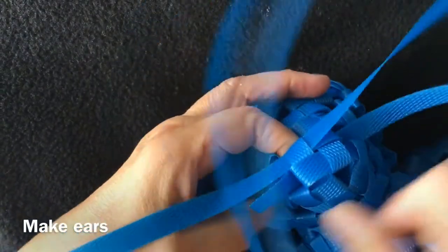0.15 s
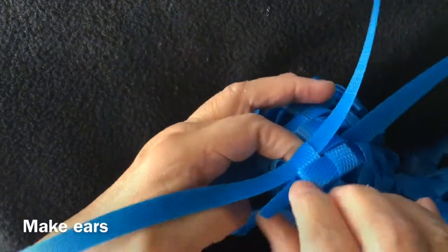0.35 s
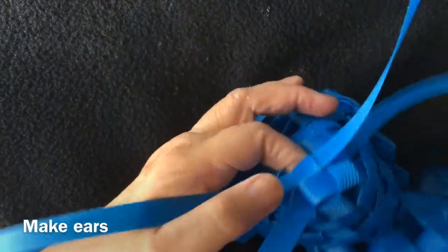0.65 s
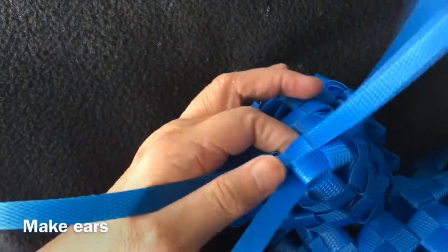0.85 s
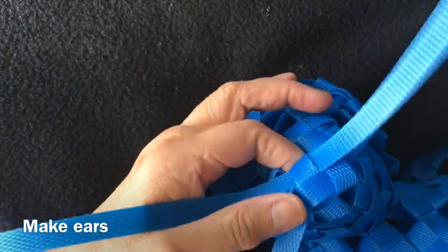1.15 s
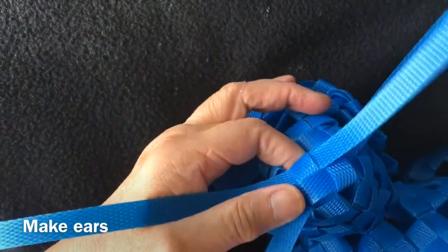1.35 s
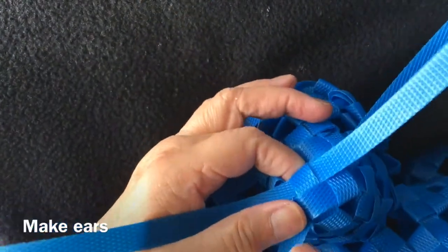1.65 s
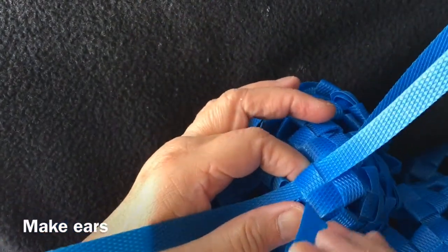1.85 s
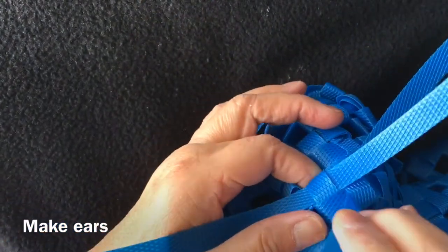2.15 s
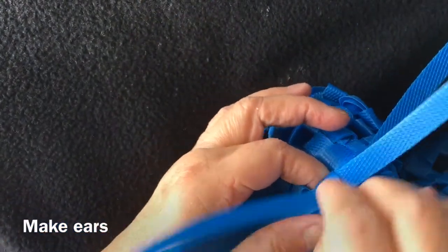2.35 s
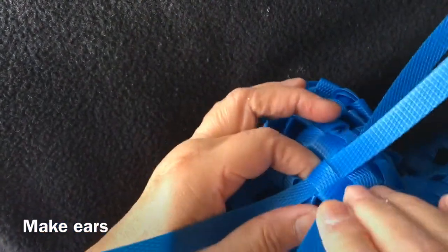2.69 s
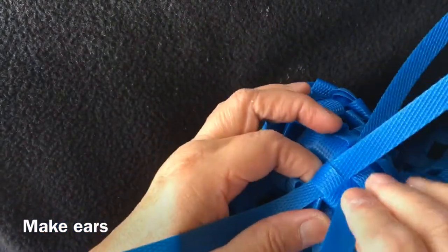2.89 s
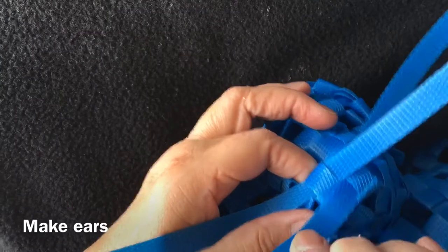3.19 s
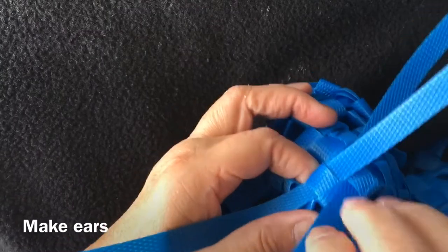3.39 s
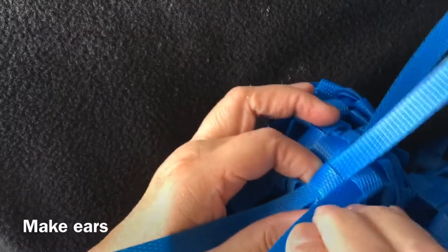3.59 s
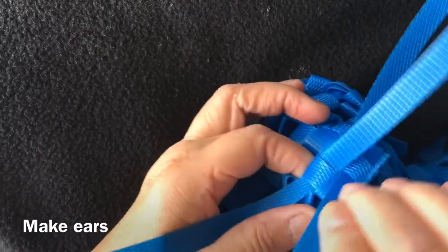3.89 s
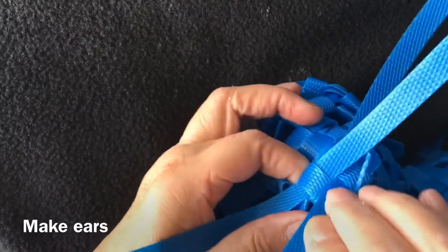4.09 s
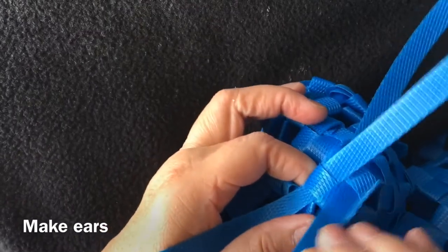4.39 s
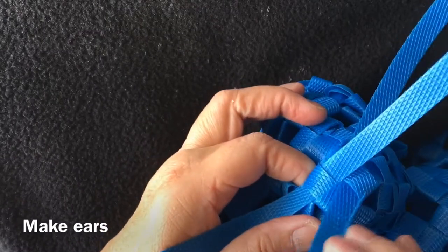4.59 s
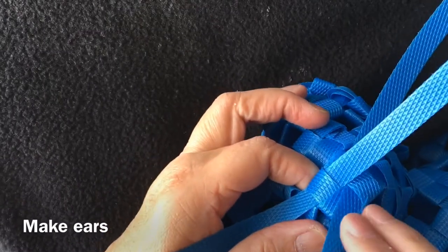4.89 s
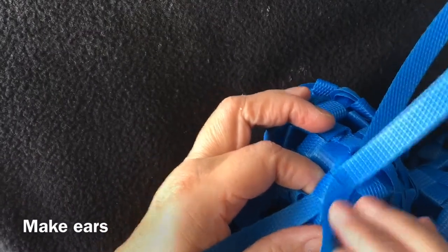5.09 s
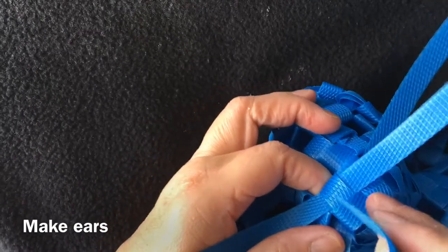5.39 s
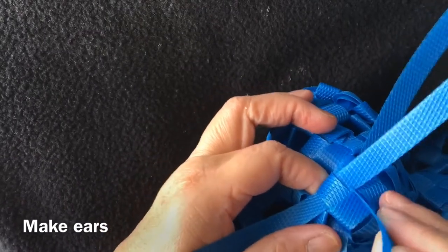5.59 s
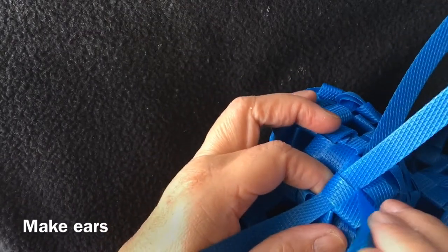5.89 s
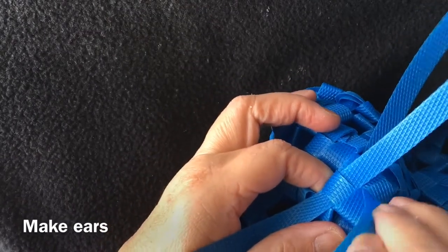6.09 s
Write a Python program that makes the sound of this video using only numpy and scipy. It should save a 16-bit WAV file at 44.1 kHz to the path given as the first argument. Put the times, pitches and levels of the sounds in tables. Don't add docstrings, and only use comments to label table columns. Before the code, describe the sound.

Fingers rustle stiff plastic straps up close, then one ribbed strap zips through with a buzzing rasp and loud snaps, followed by sparse ticks and flips.

```python
import sys
import numpy as np
from scipy import signal
from scipy.io import wavfile
from scipy.ndimage import uniform_filter1d

SR = 44100
rng = np.random.default_rng(int(sys.argv[2]) if len(sys.argv) > 2 else 0)


def file_out(sig):
    cols = np.atleast_2d(sig).T
    lim = np.clip(cols, -1, 1)
    pcm = np.round(lim * 32767).astype(np.int16)
    wavfile.write(sys.argv[1], SR, pcm)


def ratio(d):
    e = np.asarray(d, float) / 20
    return 10 ** e


N = 275625

# pitch_hz, width_hz, level_db
WEAVE_TONES = [(835, 200, 4), (1250, 120, 8.5), (1630, 930, -11), (2220, 720, 0.5), (2720, 220, -12.5)]


def evened(x):
    return x / np.sqrt(np.mean(x ** 2) + 1e-20)


def add(mix, s, sound):
    part = mix[round(s * SR):][:len(sound)]
    part += sound[:len(part)]


def along(rows):
    s, *columns = np.transpose(rows)
    return [np.interp(np.arange(N) / SR, s, column) for column in columns]


def slow_noise(samples):
    return evened(uniform_filter1d(rng.standard_normal(N), samples))


def colour(x, points):
    f, db = np.transpose(points)
    hz = abs(np.fft.fftfreq(8192, 1 / SR))
    log_gain = np.log(ratio(np.interp(np.log(hz + 1), np.log(f), db, -70, -70)))
    taps = np.fft.ifft(np.exp(np.conj(signal.hilbert(log_gain)))).real[:4096]
    return evened(signal.oaconvolve(x, taps)[:len(x)])


def resonate(x, hz, width):
    return signal.lfilter(*signal.iirpeak(hz, hz / width, SR), x)


def grit(per_s, spread_db, smooth):
    size = ratio(spread_db * np.minimum(rng.exponential(1, N), 4)) * (rng.random(N) < per_s / SR)
    flicker = signal.lfilter([1], [1, -.96], size)
    return rng.standard_normal(N) * (smooth + evened(flicker))


def patchy(x, depth_db):
    z = signal.stft(x, nperseg=256)[2]
    field = uniform_filter1d(rng.standard_normal(z.shape), size=6, axis=0)
    field = uniform_filter1d(field, size=6, axis=1)
    return evened(signal.istft(z * ratio(depth_db * evened(field)), nperseg=256)[1][:N])


def air():
    # pitch_hz, level_db (per Hz)
    air_colour = [(15, -56), (25, -8.5), (65, 2.5), (146, 1), (220, -2.5), (496, -13.5), (878, -18),
                  (2040, -23), (3510, -27), (11000, -30.5), (14000, -34.5), (16500, -54.5)]
    noise = colour(patchy(rng.standard_normal(N), 0.51), air_colour)
    return ratio(-68.5 + 2.5) * noise * ratio(0.45 * slow_noise(6000))


def room_tail():
    t = np.arange(SR // 2) / SR
    hiss = signal.lfilter([1], [1, -.6], rng.standard_normal(len(t)))
    tail = hiss * ratio(-60 * t / 0.13) * (t > .006)
    return tail / np.linalg.norm(tail)


def snap(row, noise):
    s, body_db, body_hz, edge_db, edge_hz, crack_db = row
    t = np.arange(len(noise)) / SR
    ragged = ratio(3.0 * evened(uniform_filter1d(noise[::-1], 60)))
    fade = ratio(-60 * t / .005) + ragged * ratio(-24 - 60 * t / .03)
    burst = noise * fade * np.minimum(t / .0005, 1)
    burst[20] += 4.2
    lag = round(2 * SR / edge_hz)
    burst = burst + 0.047 * np.roll(burst, lag)
    echoes = 0
    for k in range(1, 4):
        delay = 6 + round(22 * abs(noise[-k]))
        echoes = echoes + .35 * np.sign(noise[k]) * np.roll(burst, delay)
    burst = burst + echoes
    body = resonate(burst, body_hz, 0.22 * body_hz)
    body = body + 0.23 * resonate(burst, 2200.0, 3000.0) + 0.11 * resonate(burst, 460.0, 380.0)
    edge = resonate(burst, edge_hz, 800.0) + 0.4 * resonate(burst, 7200.0, 4200.0)
    crack = resonate(resonate(burst, 11500., 7400.0), 11500., 7400.0)
    parts = [(body_db, body), (edge_db, edge), (crack_db, crack)]
    return sum(ratio(db) * x / abs(x).max() for db, x in parts)


def crinkle():
    ticks_per_s = 70.
    size = ratio(4 * np.minimum(rng.exponential(1, N), 3)) * (rng.random(N) < ticks_per_s / SR)
    spot, out = rng.integers(0, 6, N), np.zeros(N)
    for k, (u, v, noise) in enumerate(zip(*rng.random((2, 6)), rng.standard_normal((6, 1000)))):
        tick = snap((0, -3, 1000 * 3 ** u, 0, 3500 * 2.2 ** v, -6), noise)
        out += signal.oaconvolve(size * (spot == k), tick)[:N]
    return evened(out)


def slide():
    # pitch_hz, level_db (per Hz)
    rustle_colour = [(1470, -24.5), (2500, -2.5), (3510, -6), (4240, -9), (7090, -10.5), (11700, -12),
                     (15200, -14.5), (16100, -35), (16500, -25.5)]
    # start_s, end_s, rustle_db, body_db
    rubs = [(0, 0.218, -62, -62.5), (0.11, 0.417, -65, -68.5), (0.342, 0.635, -72, -75),
            (0.539, 0.63, -78, -58), (0.623, 0.733, -51, -51.5), (1, 1.024, -58, -41),
            (1.01, 1.102, -61.5, -63), (1.298, 1.449, -68.5, -73.5), (1.636, 1.682, -60, -53.5),
            (1.72, 1.765, -70, -85), (0.38, 0.414, -73, -77), (1.65, 1.878, -70, -76),
            (2.46, 2.674, -79, -83), (2.805, 2.902, -72, -75), (2.927, 2.978, -64, -69),
            (3.077, 3.109, -66, -72), (3.21, 3.438, -82, -75.5), (3.378, 3.465, -73.5, -71),
            (3.652, 3.754, -70.5, -67.5), (3.774, 3.917, -69.5, -78), (3.899, 3.952, -67, -61.5),
            (4.404, 4.558, -63, -62.5), (4.48, 4.496, -51.5, -62), (4.613, 4.657, -73, -78),
            (4.693, 4.832, -77, -80.5), (4.418, 4.441, -69, -70), (2.528, 2.6, -74, -82),
            (1.568, 1.64, -73, -76), (5.125, 5.18, -61, -62), (5.145, 5.289, -53, -56),
            (5.272, 5.364, -53.5, -61.5), (6.041, 6.06, -65, -76), (6.055, 6.171, -74, -77)]
    # start_s, end_s, rustle_db, body_db
    scuffs = [(1.211, 1.251, -66, -54.5), (1.324, 1.338, -92, -58), (2.015, 2.068, -74, -70.5),
              (2.064, 2.093, -72, -62), (2.093, 2.116, -68, -61.5), (2.312, 2.336, -67.5, -67.5),
              (2.334, 2.403, -64.5, -65), (2.388, 2.503, -74.5, -76), (2.85, 2.858, -71, -67),
              (2.902, 2.918, -67.5, -72), (2.964, 2.966, -73.5, -71), (3.056, 3.084, -63, -67.5),
              (3.423, 3.466, -59, -56), (3.761, 3.812, -71, -63), (3.841, 3.843, -71, -64),
              (3.857, 3.873, -62, -57), (3.899, 3.917, -51, -49.5), (3.911, 3.924, -57, -56),
              (3.94, 4.04, -82, -76), (5.04, 5.067, -66, -71), (5.082, 5.103, -73, -53.5),
              (0.13, 0.148, -62, -78), (0.182, 0.202, -80, -61)]
    # start_s, t60_s (time to fade by 60 dB), rustle_db, body_db
    settles = [
        (1.132, 0.14, -55.5, -55),
        (1.548, 0.068, -57, -52.5),
        (1.599, 0.045, -63, -46),
        (1.662, 0.051, -48, -64),
        (2.613, 0.049, -66, -65),
        (5.618, 0.033, -53.5, -54),
        (6.039, 0.028, -56, -61),
        (6.059, 0.031, -43, -59),
    ]
    slips = patchy(grit(450., 3.5, 1.), 3.4)
    rustle = colour(slips, rustle_colour) + ratio(-13) * crinkle()
    body = evened(sum(ratio(db) * resonate(slips, hz, 3 * width) for hz, width, db in WEAVE_TONES))
    bright, dull = np.zeros((2, N))
    for start, end, rustle_db, body_db in rubs + scuffs:
        stroke = signal.windows.tukey(round((end - start) * SR), .8)
        add(bright, start, ratio(rustle_db) * stroke)
        add(dull, start, ratio(body_db) * stroke)
    for start, t60, rustle_db, body_db in settles:
        fade_db = -60 * np.arange(6000) / SR / t60
        add(bright, start, ratio(rustle_db + fade_db))
        add(dull, start, ratio(body_db + fade_db))
    return bright * rustle + dull * body


def snaps():
    # start_s, edge_db, edge_hz
    ticks = [(.071, -49, 8000), (.081, -58, 7000), (.187, -56, 2780), (.242, -44.5, 8300),
             (.345, -50, 8800), (.377, -46, 7000), (.386, -53.5, 6960), (.613, -54, 3000),
             (.623, -50, 6000), (.64, -56, 8070), (.6775, -20.5, 9400), (.81, -26, 9500), (.89, -31, 7700),
             (.97, -38, 4600), (1.017, -50, 4500), (1.2255, -49, 6500), (1.2355, -53, 7000),
             (1.377, -57, 4700), (1.404, -58, 5930), (1.551, -50, 10900), (2.044, -56, 8000),
             (2.073, -55, 6000), (2.082, -64, 5000), (2.1, -60, 4270), (2.11, -60, 9000),
             (2.506, -56, 3720), (2.531, -55, 4200), (2.872, -59, 2200), (2.885, -61, 9900),
             (2.929, -63, 13000), (2.956, -54, 11000), (2.961, -54, 3000), (3.073, -47, 10000),
             (3.103, -57, 4580), (3.1465, -43.5, 4770), (3.266, -54.5, 12000), (3.411, -59, 3000),
             (3.433, -49, 4200), (3.437, -53, 5340), (3.443, -48, 2930), (3.8, -54, 12400),
             (3.815, -58, 4500), (3.917, -46, 4500), (3.927, -47, 9000), (3.985, -61, 12500),
             (4.095, -54.5, 4030), (4.204, -58.5, 10950), (4.675, -54, 5100), (4.943, -62.5, 8890),
             (4.992, -51, 6700), (5.144, -42, 5600), (5.216, -38, 6500), (5.2218, -35.5, 2600),
             (5.242, -40, 7000), (5.2542, -42, 7130), (5.329, -35, 12000), (5.347, -42, 3300),
             (5.6194, -45, 4350), (5.623, -41, 4260), (5.7195, -51.5, 5540)]
    # start_s, body_db, body_hz
    knocks = [(.078, -51, 735), (0.431, -45, 950), (0.527, -42.5, 2870), (.572, -53, 1080),
              (0.5862, -47, 2480), (0.594, -43, 2360), (0.649, -34.5, 2860), (.673, -24, 1250),
              (1.015, -24, 1120), (1.0864, -33.5, 1335), (1.2251, -46.5, 1830), (2.0731, -47.5, 1180),
              (2.1, -37.5, 1165), (2.372, -40.5, 1113), (2.9152, -47.5, 1960), (3.102, -47.5, 2220),
              (5.62, -42, 1250), (3.211, -53.5, 1780), (3.261, -53.5, 1200), (3.44, -40.5, 2730),
              (3.532, -50, 1085), (3.788, -40.5, 1100), (3.842, -42.5, 1000), (3.866, -47, 1080),
              (4.013, -42, 3500), (4.462, -41, 1871), (4.992, -46.5, 1210), (6.0396, -44, 1250)]
    # start_s, edge_db, edge_hz, body_db, body_hz
    cracks = [(0.1043, -44, 7100, -49, 1850), (0.138, -49, 5200, -54, 2680), (0.3242, -45, 5200, -47, 1830),
              (0.675, -30, 5950, -26.5, 2820), (0.6859, -31, 7640, -12.5, 1900),
              (0.6886, -13, 7766, -14.5, 2900), (0.832, -32, 6600, -25, 1500), (.817, -35, 9400, -30, 1700),
              (0.8294, -28, 11000, -20, 1310), (0.837, -14.5, 6600, -20, 1510),
              (0.8448, -17, 6660, -13.5, 1450), (0.949, -21, 6760, -20, 1800),
              (1.133, -19.5, 7150, -23, 2390), (1.547, -40, 7150, -39, 1230),
              (1.6611, -23.5, 9250, -30.5, 2340), (2.6142, -28, 13600, -35, 3990),
              (2.6272, -46.5, 8600, -49, 3320), (2.9439, -44.5, 4440, -47.5, 1080),
              (3.07, -49, 4050, -71.5, 2470), (3.0694, -51, 6780, -59, 2720),
              (3.8616, -47.5, 6350, -35.5, 994), (3.9051, -32, 6200, -31.5, 1880),
              (4.4846, -27.5, 4740, -35.5, 1887), (5.0874, -22, 4410, -42.5, 1400),
              (5.2516, -40.5, 3850, -36, 2230), (5.304, -33, 6240, -39, 2460),
              (5.327, -25.5, 7400, -35.5, 2110), (0.29, -58, 4000, -45.5, 1800)]
    # start_s, edge_db, edge_hz, body_db, body_hz
    clacks = [(0.3089, -45, 6740, -53, 1940), (0.4248, -44, 6800, -58, 1000),
              (0.6896, -16, 6650, -12, 1168), (0.9855, -21, 6440, -40, 1960),
              (0.9949, -24.5, 4400, -28, 1970), (1.0111, -36, 6736, -36.5, 2670),
              (1.1972, -39, 6460, -40.5, 2460), (1.2311, -53, 7160, -38.5, 1180),
              (1.601, -20, 5920, -27, 2080), (1.672, -29, 4500, -54.5, 3540),
              (2.007, -48, 5820, -42.5, 1190), (2.369, -46, 7030, -38, 1970),
              (2.489, -43.5, 7000, -47, 1480), (3.161, -44.5, 5600, -45.5, 2000),
              (3.451, -41, 6820, -40.5, 2040), (3.9106, -53, 6604, -33.5, 1390),
              (4.6929, -41, 5840, -33, 1130), (5.0533, -45.5, 7030, -50.5, 1947),
              (5.1754, -19.5, 11880, -24.5, 5070), (5.1783, -6, 7460, -19.5, 1340),
              (5.194, -34, 3460, -35, 2000), (5.162, -50, 7200, -37, 1305),
              (5.1975, -35.5, 3530, -32.5, 2000), (5.2075, -33, 3500, -33, 1340),
              (5.2963, -39, 3640, -49.5, 2360), (6.05, -33, 7080, -50, 1500), (6.057, -21, 7150, -33, 1550)]
    rows = [(s, b, bhz, e, ehz, e - 3) for s, e, ehz, b, bhz in cracks]
    rows += [(s, b, bhz, e, ehz, e - 22.5 + 0.15 * (e + 30)) for s, e, ehz, b, bhz in clacks]
    rows += [(s, b, bhz, b - 18, 6900, b - 23) for s, b, bhz in knocks]
    rows += [(s, e - 13.5, 1800, e, ehz, e - 11) for s, e, ehz in ticks]
    out = np.zeros(N)
    for row, noise in zip(rows, rng.standard_normal((len(rows), 1500))):
        add(out, row[0], snap(row, noise))
    bounce = np.zeros(N)
    add(bounce, .0026, ratio(-14.5) * out)
    return out + bounce


def pull():
    # start_s, ribs_per_s, force_db, hum_db (from tension),
    # slack_db (favours the lowest tone), weave_db (ring of the weave)
    course = [
        (0.666, 176, -41.5, -59.5, -0.5, -2),
        (.71, 204, -37.5, -51, -3, -5.5),
        (0.739, 248, -35, -43, 1.5, -6.5),
        (0.784, 272, -38.5, -44, -5, 1),
        (0.807, 248, -36.5, -57.5, -3, 7),
        (0.842, 254, -34.5, -49, -5.5, -2),
        (0.861, 300, -35, -45.5, -6, -3),
        (0.934, 311, -36.5, -46.5, 0, 1),
        (1.005, 178, -39, -41, -18.5, 1.5),
    ]
    # pitch_hz, level_db (per Hz)
    rasp_colour = [(410, -18.5), (700, -11), (912, -24), (1100, -4.5), (1650, -7), (2840, -11), (3120, -16),
                   (9600, -17.5), (14800, -22), (15900, -26), (16500, -57.5)]
    # pitch_hz, level_db
    strap_tones = [(170, -7), (250, 2.5), (310, -3), (400, 2.5), (520, -3.5), (610, 3.5), (760, 0),
                   (980, -21), (1110, -3.5), (1250, -3), (1450, -7.5), (1620, -5), (1850, -5.5),
                   (2170, -1.5), (2600, -11)]
    per_s, force_db, hum_db, slack_db, weave_db = along(course)
    turns = np.cumsum(per_s * (1 + 0.013 * slow_noise(300))) / SR
    ribs = np.diff(np.floor(turns), prepend=0) * ratio(2.5 * rng.standard_normal(N))
    buzz = np.zeros(N)
    for k, (hz, width, db) in enumerate(WEAVE_TONES):
        buzz += (-1) ** k * ratio(db) * resonate(resonate(ribs, hz, width), hz, 2 * width)
    slips = grit(800., 3., 2.)
    gate = 1.1 + np.exp(-(turns % 1) / 0.57)
    rasp = colour(patchy(slips * gate, 2.5), rasp_colour)
    edge_tones = [(4300, -3), (6500, 1), (9500, -3.0)]
    rasp = rasp + sum(ratio(db) * resonate(rasp, hz, 700.0) for hz, db in edge_tones)
    hum = np.zeros(N)
    for k in range(1, 10):
        level_db = hum_db if k < 4 else force_db + weave_db - 7
        level_db = level_db + slack_db * (k == 1) - slack_db * (k == 2)
        level_db = level_db + np.interp(k * per_s, *np.transpose(strap_tones))
        hum += ratio(level_db) * ratio(4 * slow_noise(900)) * np.sin(2 * np.pi * k * turns)
    hum *= ratio(9 * np.minimum(np.gradient(per_s) * SR / 1000, 0))
    on, start, end = np.zeros(N), course[0][0], course[-1][0]
    add(on, start, signal.windows.tukey(round((end - start) * SR), .05))
    knocks = ratio(-11.5 + weave_db) * patchy(buzz, 3.2)
    return on * (ratio(force_db) * (rasp + ratio(-27.5) * crinkle() + knocks) + hum)


def bumps():
    # peak_s, level_db, build_up_s, release_s
    leans = [
        (.75, -48.5, 0.32, 0.07),
        (.96, -41.5, 0.2, 0.14),
        (1.698, -54.5, 0.34, 0.03),
        (2.389, -48, 0.094, 0.024),
        (2.868, -64.5, 0.11, 0.07),
        (3.93, -53.5, 0.42, 0.11),
        (4.488, -50, 0.11, 0.072),
        (5.189, -44, 0.068, 0.1),
    ]
    # start_s, level_db, pitch_hz
    pushes = [(0.97, -36, 94), (0.985, -25, 385), (1.008, -29, 401), (2.859, -38.5, 107),
              (2.959, -49.5, 129), (3.147, -39.5, 447), (3.441, -71.5, 141), (3.865, -43, 170),
              (3.902, -40, 169), (4.525, -48.5, 59.6), (5.179, -32, 277), (5.183, -57, 120),
              (1.2, -52.5, 350), (1.662, -38, 410), (4.692, -43, 486), (5.181, -27, 514)]
    # pitch_hz, level_db (per Hz)
    rumble_colour = [(15, -29), (25, -10), (49, -8.5), (107, -4.5), (177, 0), (233, -10.5), (322, -3.5),
                     (500, -20.5), (650, -30.5), (1100, -120)]
    t = np.arange(N) / SR
    weight = ratio(-73)
    for s, db, rise, fall in leans:
        weight = weight + ratio(db - 25 * np.where(t < s, (s - t) / rise, (t - s) / fall))
    out = weight * ratio(-6.5) * colour(grit(40., 0.96, 10.0), rumble_colour)
    t = t[:6000]
    for s, db, hz in pushes:
        fade = ratio(db - 60 * t * hz / 6.75)
        add(out, s, fade * np.sin(2 * np.pi * hz * t) * np.minimum(t * hz, 1))
    return out


def scene():
    far = air() + bumps()
    near = slide() + snaps() + pull()
    return (near + ratio(-21.0) * signal.fftconvolve(near, room_tail())[:N] + far)[None]


def smear(x):
    # start_s, spread_db, centre_hz, half_width_hz
    smeared_snaps = [(.689, 5, 6500, 3000), (.838, -1, 6500, 1497), (1.133, -19, 7000, 2500),
                     (1.601, -7, 5540, 2535), (1.664, 6, 4200, 3535), (3.147, 4, 5000, 2990),
                     (5.62, 3, 4400, 1197), (3.908, -1, 5000, 4000), (4.485, 1, 4980, 2550),
                     (4.693, 11.5, 5800, 2515), (4.992, 6.5, 6680, 890), (5.088, 4, 5500, 2500),
                     (5.176, 6.5, 7150, 700), (5.327, -4.5, 6800, 2000), (6.057, -2, 7150, 1195)]
    hz, t, z = signal.stft(x, SR, nperseg=1024, noverlap=768)
    blurred = z * np.exp(2j * np.pi * rng.random(z.shape)) * ((hz > 700) & (hz < 8300))[:, None]
    size = abs(blurred)
    nearby = abs(uniform_filter1d(size, size=12, axis=1))
    blurred *= (nearby / (size.max(axis=1, keepdims=True) + 1e-12)) ** 0.22
    spread = ratio(-10.0)
    for s, db, mid_hz, width in smeared_snaps:
        band_db = db - 8.0 * ((hz[:, None] - mid_hz) / width) ** 2
        spread = spread + ratio(band_db) * (abs(t - s) < .012)
    return signal.istft(blurred * spread, SR, nperseg=1024, noverlap=768)[1][:, :N]


def top_cut(x):
    return signal.sosfilt(signal.butter(12, 16820, fs=SR, output="sos"), x)


def record(dry):
    dry = signal.sosfilt(signal.butter(4, 42., "high", fs=SR, output="sos"), dry)
    low = signal.oaconvolve(dry, signal.firwin(401, 15800, fs=SR)[None], "same")
    dry = low + ratio(-24.0) * (dry - low)
    return top_cut(dry + smear(dry))


dry = scene()
out = record(dry)
file_out(out)
```